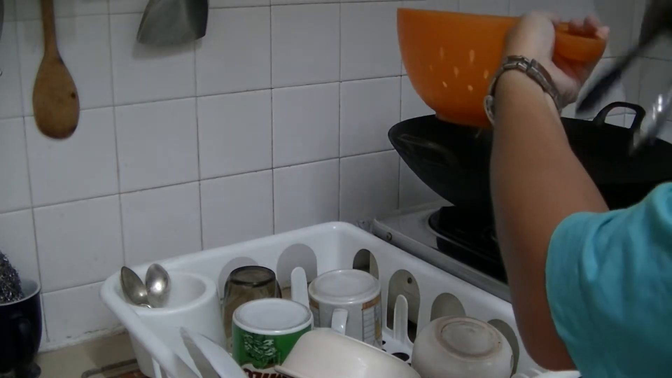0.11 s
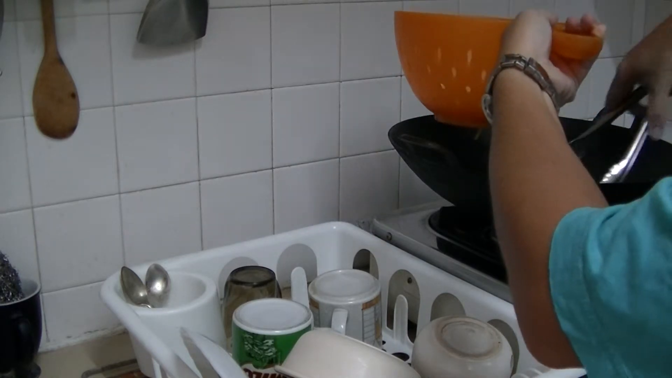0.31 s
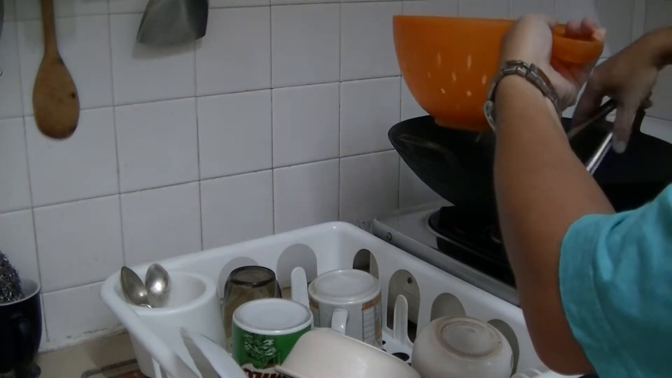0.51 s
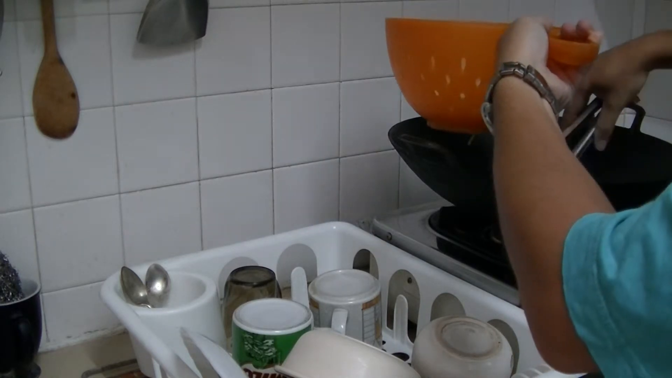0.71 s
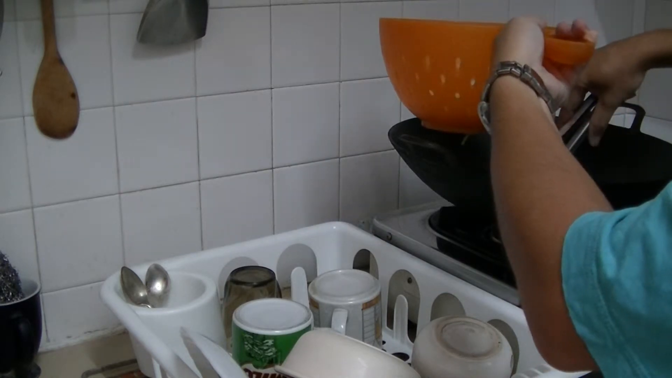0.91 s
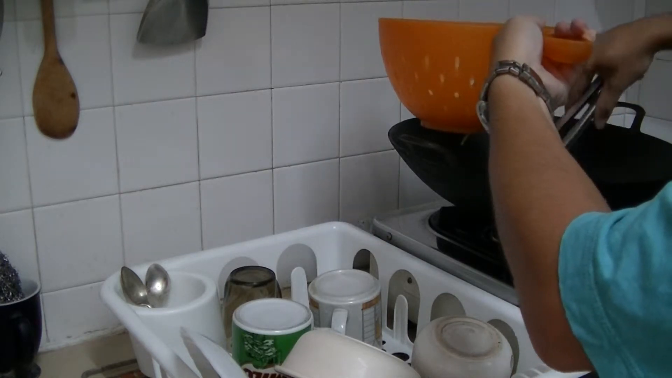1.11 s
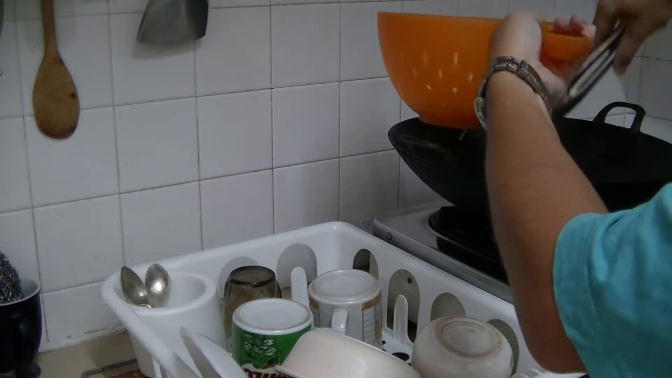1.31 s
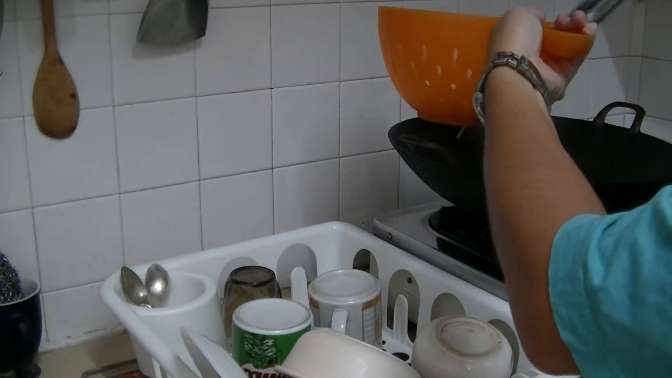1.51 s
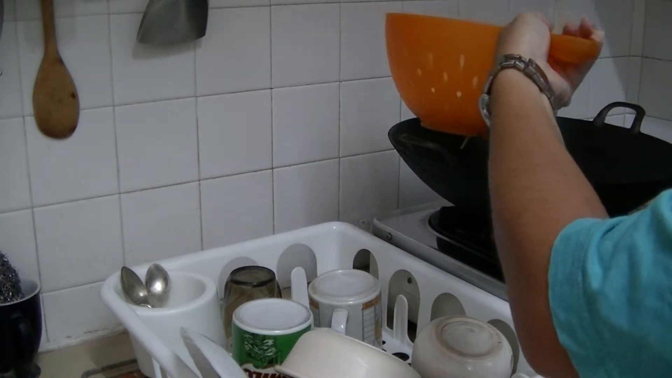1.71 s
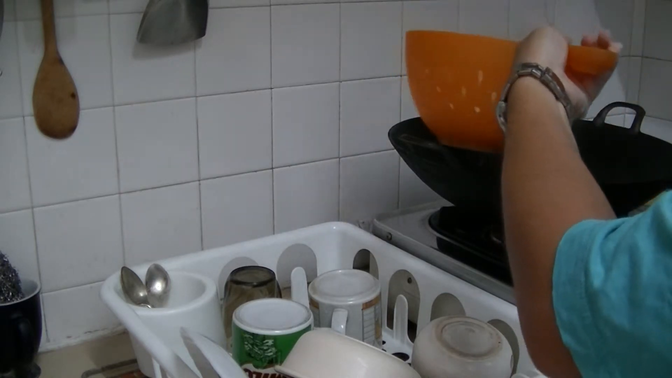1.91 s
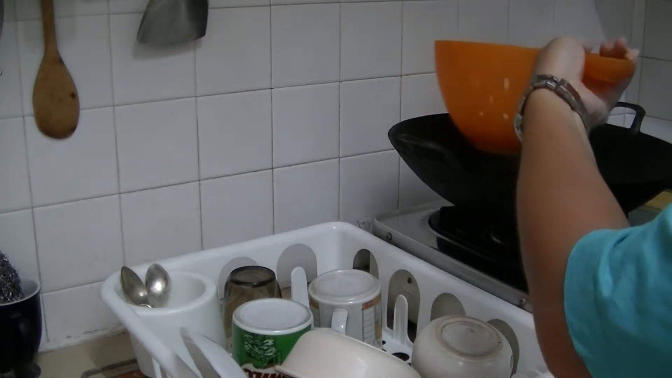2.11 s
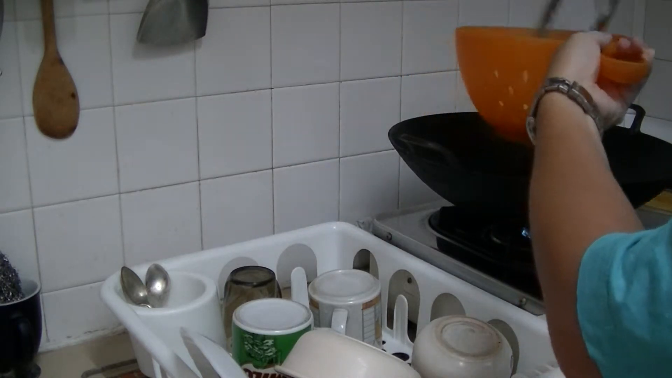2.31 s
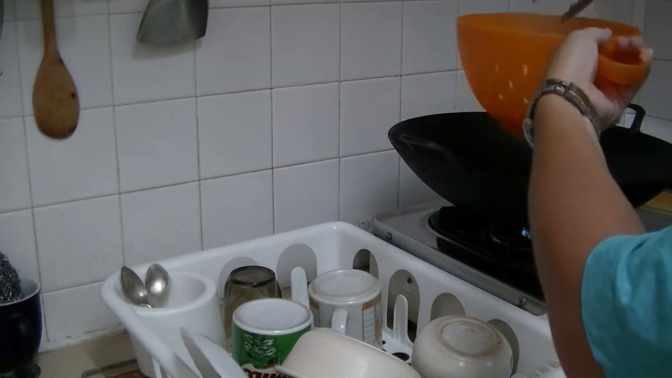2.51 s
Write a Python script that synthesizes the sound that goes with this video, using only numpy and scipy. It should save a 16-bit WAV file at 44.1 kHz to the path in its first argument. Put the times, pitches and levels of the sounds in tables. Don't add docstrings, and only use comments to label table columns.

```python
import sys
import numpy as np
from scipy import signal
from scipy.fft import rfft, irfft
from scipy.io import wavfile
from scipy.ndimage import uniform_filter1d

SR = 44100
rng = np.random.default_rng(int(sys.argv[2]) if len(sys.argv) > 2 else 0)


def elevation(decibels):
    levels = np.asarray(decibels, float)
    return 10 ** (levels / 20)


def output_pcm(signal):
    pcm = np.clip(np.atleast_2d(signal).T, -1, 1) * 32767
    wavfile.write(sys.argv[1], SR, np.round(pcm).astype(np.int16))


N = 114660

# time in seconds, level in dB.
BLOW_CONTACTS = [(.2215, -42), (0.2235, -26.5), (.2255, -23), (0.2276, -24), (.2292, -22.5), (.2318, -29),
                 (.2348, -37), (0.2396, -41), (0.2467, -44), (0.2589, -32), (0.274, -31)]
# frequency in Hz, level in dB per Hz.
BLOW_COLOUR = [(420, -21), (2000, -22.5), (2500, -8.5), (3700, -15), (4400, -11), (5600, -7.5),
               (11500, -19), (16000, -42)]
# time in seconds, level in dB.
TONG_CONTACTS = [
    (.2285, -20),
    (.2243, -29),
]
# frequency in Hz, level in dB, t60 in seconds.
TONG_MODES = [(3040, -20, 0.28), (3325, -21, 0.18), (3510, -12, 0.072), (3558, -1, 0.21), (3664, -5, 0.33),
              (3800, -2, 0.086), (4070, -7, 0.075), (4350, -28, .18), (4720, -9.5, 0.3), (4940, -8.5, 0.16),
              (4965, -8, 0.26), (5270, -16, 0.076), (5550, -19, .15), (6240, -2.5, 0.065)]
# time in seconds, level in dB.
REBOUND = [
    (.2445, -21.5),
]
# frequency in Hz, level in dB, t60 in seconds.
REBOUND_MODES = [(3796, 2, 0.29), (3868, -9, 0.17), (4660, -15, .15), (5130, -12, 0.22), (6170, -21, .1)]


def blow():
    forces = np.zeros((len(BLOW_CONTACTS), N))
    for k, (s, db) in enumerate(BLOW_CONTACTS):
        forces[k, int(s * SR)] = elevation(db + 24)
    bowl = wok(forces, BLOW_COLOUR, t60=0.11)

    t = np.arange(N) / SR
    since = np.maximum(t - BLOW_CONTACTS[1][0], 0)
    rise_s, damped_s, hum_t60_s = 0.04, 0.33, 2.2
    swell = (1 - np.exp(-(since / rise_s) ** 2)) * np.exp(-(since / damped_s) ** 4)
    hum = elevation(-53.5 - 60 * since / hum_t60_s) * swell * np.sin(2 * np.pi * 281 * since)

    grip_s, grip_db_per_s = 0.28, 250
    grip = elevation(-grip_db_per_s * np.maximum(t - grip_s, 0))
    tongs = strike(TONG_CONTACTS, TONG_MODES) + grip * strike(REBOUND, REBOUND_MODES)
    return high_pass(tongs, 2300) + bowl + hum


def strike(contacts, modes):
    s, db = np.transpose(contacts)
    out, chance_db = 0, rng.normal(0, 0.84, (len(s), len(modes)))
    for k, (hz, level_db, t60) in enumerate(modes):
        clicks = np.zeros(N)
        clicks[(s * SR).astype(int)] = elevation(db + level_db + chance_db[:, k])
        out = out + ring(clicks, hz, t60)
    return out


def wok(forces, colour, t60, count=600):
    hz = np.linspace(420, 16000, count) + rng.uniform(-12, 12, count)
    decay = t60 * (3000 / hz) ** 0.48 * elevation(rng.normal(0, 3, count))
    chance = np.clip(rng.standard_normal((len(forces), count)), -2, 2)
    spread_db = 2
    gains = elevation(at_hz(colour, hz) + spread_db * chance) / np.sqrt(decay)
    gains = gains * rng.choice([-1, 1], chance.shape)
    t = np.arange(SR // 4)[:, None] / SR
    modes = elevation(-60 * t / decay) * np.sin(2 * np.pi * (hz * t + rng.random(count)))
    responses = gains @ modes.T
    responses = responses / np.sqrt(np.sum(responses ** 2, axis=1, keepdims=True))
    return high_pass(signal.fftconvolve(forces, responses, axes=1)[:, :N].sum(axis=0), 470)


# time in seconds, pressure in dB, hollow pitch in Hz, hollow share in dB.
SCRAPE = [
    (.31, -39, 2380, -5),
    (.385, -29.5, 2370, -14),
    (.478, -36.5, 2380, 1),
    (.52, -34.5, 2410, -1),
    (.6, -38.5, 2140, 0.5),
    (.68, -36.5, 2200, 1.5),
    (.706, -45.5, 2120, -4),
    (.772, -46, 2130, -5),
    (.83, -97, 2170, 0),
]
# frequency in Hz, level in dB per Hz.
SCRAPE_COLOUR = [(420, -27), (800, -11), (1800, -19), (2200, -4), (3600, 1), (7000, -10), (12000, -27.5),
                 (16000, -51)]


def scrape():
    db, hollow_hz, share_db = in_time(SCRAPE)
    t = np.arange(N) / SR
    begin, end = SCRAPE[0][0], SCRAPE[-1][0]
    grit_per_s, grit_spread_db, judder_db = 6000, 2.5, 0.5
    sizes = elevation(grit_spread_db * np.minimum(rng.exponential(1, N), 5))
    grit = rms_one(sizes * rng.choice([-1, 1], N) * (rng.random(N) < grit_per_s / SR))
    stroke = elevation(db + judder_db * drift(34)) * (t > begin) * (t < end)
    hollow = elevation(share_db - 7.5) * moving_peak(grit, hollow_hz, width_hz=364)

    places, place_s = 12, 0.045
    along = np.clip((t - begin) / place_s - np.arange(places)[:, None], -1, 1)
    bowl = wok(grit * stroke * np.cos(np.pi / 2 * along), SCRAPE_COLOUR, t60=0.045)
    return elevation(-2.5) * bowl + hollow * stroke + elevation(-2.5) * rasp(grit * stroke, SCRAPE_COLOUR)


def rasp(force, colour):
    gain = elevation(at_hz(colour, np.maximum(np.fft.rfftfreq(N, 1 / SR), 1)))
    return high_pass(irfft(rfft(force) * gain / np.sqrt(np.mean(gain ** 2)), N), 440)


# start in seconds, length in seconds, frequency in Hz, level in dB.
CATCHES = [(.335, 0.015, 700, -45), (.345, 0.049, 930, -46.5), (0.36, 0.074, 980, -55),
           (.34, 0.18, 1580, -52.5), (.34, 0.057, 2300, -35), (.37, 0.054, 2850, -47),
           (.355, 0.037, 4000, -39), (.36, .07, 5100, -34), (.37, .05, 4100, -40), (0.53, .06, 4800, -38),
           (0.26, 0.065, 5600, -39), (0.41, 0.07, 6400, -53), (0.32, 0.062, 7200, -46),
           (0.38, 0.065, 2270, -37), (0.54, .07, 790, -65), (0.4, 0.069, 5100, -48), (0.49, .06, 4520, -44),
           (.44, 0.061, 7020, -41.5), (0.44, 0.092, 800, -46), (.49, 0.023, 2480, -39),
           (.5, 0.042, 2340, -30.5), (0.38, 0.034, 5020, -46), (0.49, .035, 5800, -46),
           (0.32, .08, 3380, -39.5), (.53, 0.045, 6900, -47.5), (.555, 0.067, 775, -43),
           (.55, .05, 2230, -38), (0.66, 0.044, 2040, -43.5), (.63, 0.049, 650, -45),
           (.63, 0.044, 1350, -50), (.65, 0.036, 2200, -39), (.675, .035, 2300, -37),
           (.64, 0.074, 3100, -41), (.65, 0.028, 6000, -46), (.665, 0.052, 750, -48.5),
           (0.71, 0.038, 2500, -47), (0.709, 0.11, 720, -51), (.715, 0.056, 640, -48.5),
           (0.66, .05, 2200, -55), (.72, .07, 3050, -44)]


def catches():
    out, white = np.zeros(N), rng.standard_normal(N)
    roughness, width_hz = 0.4, 60
    for s, length, hz, db in CATCHES:
        t = np.arange(int(length * SR)) / SR
        i = int(s * SR)
        rough = rms_one(peak(white[i - 2000:i + len(t)], hz, width_hz)[-len(t):])
        tone = np.sqrt(2) * np.sin(2 * np.pi * hz * t)
        swell = np.sin(np.pi * t / length)
        out[i:i + len(t)] += elevation(db) * swell * (roughness * rough + (1 - roughness) * tone)
    return out


# time in seconds, level in dB.
CLACK_CONTACTS = [
    (2.3095, -30),
    (2.3116, -29.5),
    (2.316, -34.5),
    (2.3225, -46),
]
# frequency in Hz, level in dB, t60 in seconds.
CLACK_MODES = [(3900, -11, .015), (4900, -13, .008), (6100, -6, .02), (6400, -10, .012), (9200, -10, .01),
               (10600, -15, .008)]


def clack():
    puff = sum(elevation(db + 1.5) * burst(s, t60=0.036) for s, db in CLACK_CONTACTS)
    hiss = peak(puff, 5800, 990) + 0.36 * peak(puff, 8100, 2800) + 0.85 * peak(puff, 4400, 1300)
    return high_pass(strike(CLACK_CONTACTS, CLACK_MODES) + hiss, 3300)


# time in seconds, level in dB, centre in Hz, width in Hz, t60 in seconds.
TICKS = [(0.807, -54, 1500, 2000, 0.02), (0.872, -45.5, 2580, 2520, 0.19), (0.907, -46, 3500, 3500, 0.1),
         (1.626, -40, 2880, 900, 0.06), (1.631, -42, 3050, 1000, 0.11), (1.66, -50, 3600, 1200, .15),
         (1.661, -48.5, 6360, 2980, 0.077), (1.694, -44, 1700, 900, 0.05), (1.7, -49.5, 1500, 500, 0.1),
         (1.832, -49, 6600, 3970, 0.063), (1.957, -58.5, 11000, 4000, 0.073), (2.448, -64.5, 308, 60, 0.64)]


def ticks():
    out = 0
    for s, db, hz, wide, t60 in TICKS:
        knock = peak(peak(burst(s, t60), hz, wide), hz, 2 * wide)
        out = out + elevation(db) * np.sqrt(SR / np.pi / wide) * knock
    return out


# time in seconds, frequency in Hz, level in dB.
CREAK = [(1.945, 1310, -59), (1.965, 1410, -55), (1.988, 1460, -54), (2.011, 1430, -50.5),
         (2.031, 1460, -52.5), (2.052, 1450, -54), (2.072, 1420, -54), (2.098, 1385, -55),
         (2.118, 1420, -56), (2.137, 1400, -57), (2.152, 1365, -55), (2.17, 1380, -58),
         (2.192, 1450, -50.5), (2.212, 1370, -56), (2.235, 1350, -55), (2.25, 1414, -49),
         (2.268, 1400, -54), (2.29, 1400, -58), (2.308, 1410, -58), (2.322, 1400, -55), (2.338, 1380, -64)]


def creak():
    t = np.arange(N) / SR
    slip_s = 0.0054
    out = 0
    for s, hz, db in CREAK:
        slip = np.exp(-((t - s) / slip_s) ** 2 / 2)
        out = out + elevation(db) * slip * np.sin(2 * np.pi * hz * (t - s))
    return out


def kitchen(x):
    t = np.arange(SR // 2) / SR
    decay = elevation(-60 * t / 0.63)
    white = rng.standard_normal((2, len(t))) * decay * (t > 0.004)
    low = signal.sosfilt(signal.butter(1, 1750, fs=SR, output="sos"), white)
    tail = low + (white - low) * decay
    tail = tail / np.sqrt(np.sum(tail[0] ** 2))
    mid, side = signal.fftconvolve(x[None], tail, axes=1)[:, :N]
    bright = high_pass(peak(side, 7700, 6000), 7200)
    return mid + (0.14 * side + 0.28 * bright) * [[1], [-1]]


# time in seconds, level in dB.
FLAME = [
    (0, 2),
    (.9, 1),
    (1.3, 0.5),
    (1.8, 1),
    (2.6, 1),
]
# frequency in Hz, width in Hz, level in dB.
BURNER = [(2030, 18, -72), (2110, 36, -68.5), (2250, 30, -67.5), (2552, 64, -69), (3190, 28, -72.5),
          (3494, 97, -68.5)]
# frequency in Hz, level in dB per Hz.
HISS_COLOUR = [(820, -64), (1400, -7), (1650, -3), (2790, -4.5), (3060, -2.5), (4860, -7), (6220, -12),
               (15100, -24.5), (16400, -30)]
# frequency in Hz, level in dB per Hz.
ROOM_COLOUR = [(20, -12), (45, -18), (90, -16.5), (150, -21.5), (260, -9), (330, -8.5), (600, -4.5),
               (1400, -10)]


def flame():
    tones = sum(elevation(db) * rms_one(peak(rng.standard_normal(N), hz, wide)) for hz, wide, db in BURNER)
    hum = elevation(-70) * moving_peak(rng.standard_normal(N), np.full(N, 318.8), width_hz=9.3)
    strength = elevation(in_time(FLAME)[0] + 0.5 * drift(1.6))
    hiss = strength * (elevation(-56) * air(HISS_COLOUR) + tones)
    return hiss + elevation(-60) * air(ROOM_COLOUR) + hum


# frequency in Hz, likeness (held to 0 to 1 in use).
LIKENESS = [(60, -0.11), (180, 0.6), (550, 0.31), (1650, 0.82), (4970, 0.97), (15000, 0.9)]


def air(spectrum):
    hz = np.maximum(np.fft.rfftfreq(N, 1 / SR), 1)
    mid, side = rfft(rng.standard_normal((2, N)))
    alike = np.clip(at_hz(LIKENESS, hz), 0, 1)
    gain = elevation(at_hz(spectrum, hz)) * (hz >= spectrum[0][0]) * (hz < spectrum[-1][0])
    both = np.sqrt(1 + alike) * mid + np.sqrt(1 - alike) * side * [[1], [-1]]
    return rms_one(irfft(gain * both, N))


def burst(s, t60):
    t = np.arange(N) / SR - s
    return rng.standard_normal(N) * (t >= 0) * elevation(-60 * np.clip(t, 0, 2) / t60)


def ring(clicks, hz, t60):
    r, w = elevation(-60 / (t60 * SR)), 2 * np.pi * hz / SR
    return signal.lfilter([0, np.sin(w)], [1, -2 * r * np.cos(w), r * r], clicks + 1e-18)


def peak(x, hz, width_hz):
    r = np.exp(-np.pi * width_hz / SR)
    poles = [1, -2 * r * np.cos(2 * np.pi * hz / SR), r * r]
    return signal.lfilter([(1 - r * r) / 2, 0, (r * r - 1) / 2], poles, x)


def moving_peak(x, hz, width_hz):
    turn = np.exp(2j * np.pi * np.cumsum(hz) / SR)
    band = signal.sosfilt(signal.butter(2, width_hz / 2, fs=SR, output="sos"), x / turn)
    even_s = 0.057
    power = uniform_filter1d(np.abs(band) ** 2, size=int(even_s * SR))
    level = np.sqrt(np.abs(power) + 1e-12)
    return np.sqrt(2) * (band / level * turn).real


def high_pass(x, hz):
    return signal.sosfilt(signal.butter(4, hz, "high", fs=SR, output="sos"), x)


def drift(rate):
    r = np.exp(-2 * np.pi * rate * 40 / SR)
    white = rng.standard_normal(N // 40 + 2002)
    slow = signal.lfilter([1], [1, -2 * r, r * r], white)[2000:]
    return np.interp(np.arange(N) / 40, np.arange(len(slow)), rms_one(slow))


def rms_one(x):
    return x / np.sqrt(np.mean(x ** 2) + 1e-20)


def in_time(rows):
    s, *columns = np.transpose(rows)
    return [np.interp(np.arange(N) / SR, s, c) for c in columns]


def at_hz(points, hz):
    point_hz, values = np.transpose(points)
    return np.interp(np.log(hz), np.log(point_hz), values)


def scene():
    metal = blow() + scrape() + ticks() + clack()
    pan = elevation([[0.77], [-0.77]])
    return (metal + catches() + creak()) * pan + elevation(-5.5) * kitchen(metal) + flame()


def top_cut(x):
    return signal.sosfilt(signal.butter(12, 16500, fs=SR, output="sos"), x)


def record(dry):
    top, cut_hz = 3.0, 15900
    rounded = top * np.tanh(dry / top)
    mix = signal.sosfilt(signal.cheby2(10, 50, cut_hz + 700, fs=SR, output="sos"), rounded)
    return top_cut(mix)


dry = scene()
out = record(dry)
output_pcm(out)
```